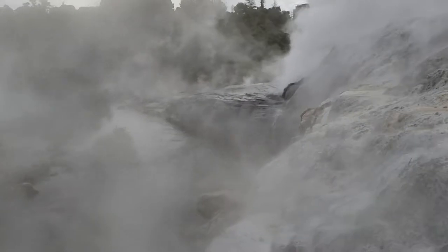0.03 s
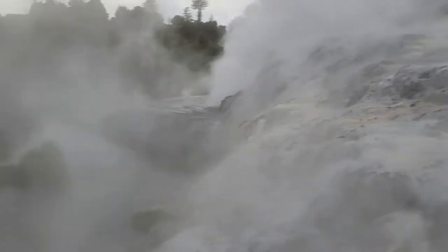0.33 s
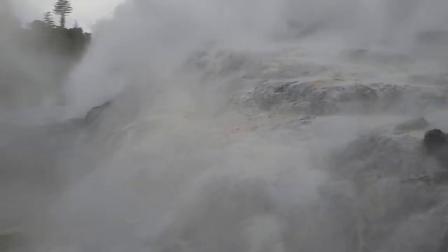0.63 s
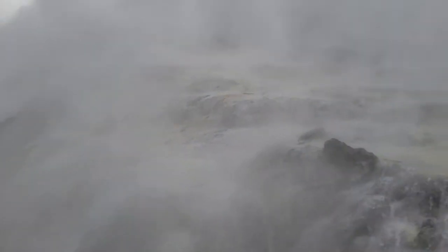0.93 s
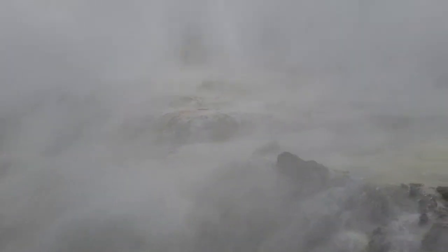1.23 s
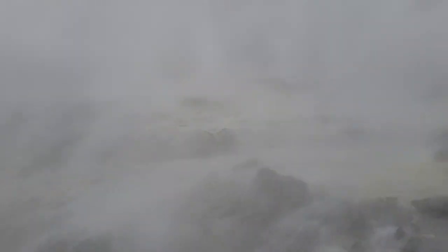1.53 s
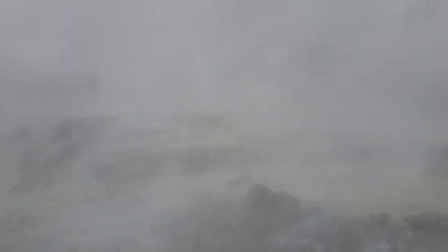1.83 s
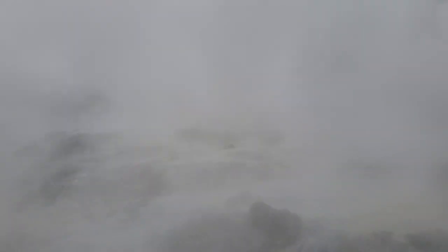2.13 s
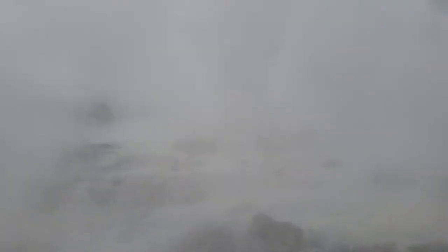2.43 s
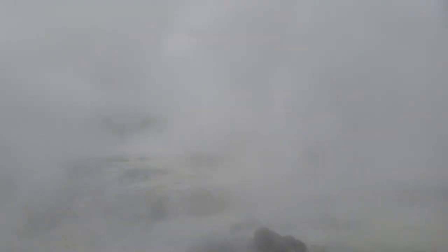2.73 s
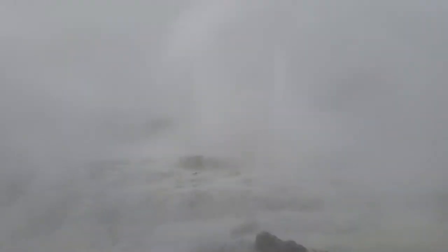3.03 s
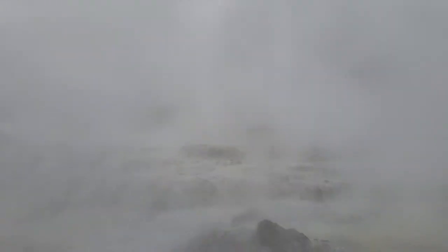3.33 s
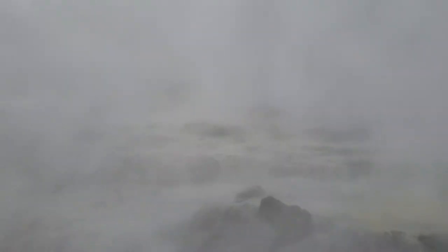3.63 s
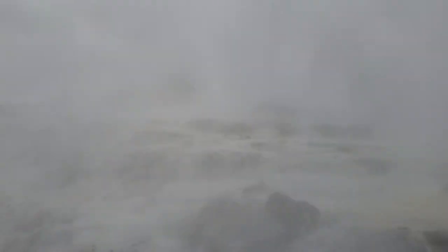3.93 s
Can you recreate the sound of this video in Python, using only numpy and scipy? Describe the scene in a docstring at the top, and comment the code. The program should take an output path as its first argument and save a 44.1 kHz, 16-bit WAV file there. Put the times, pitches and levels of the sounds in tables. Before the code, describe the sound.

Steam rushes and hisses from vents in the ground, with wind buffeting the microphone.

```python
"""Steam vents rush on a geothermal slope, turbulent jets over the low rumble of boiling ground.
At first a throaty vent fades away, while nearer steam adds a fuller rush and a bright hiss on the right.
Puffs of wind buffet the two microphone ports, hardest near the two-second mark.
Just after, the near rush fades and the hiss cuts off, leaving the vent field and the rumble."""
import sys
import numpy as np
from scipy import signal
from scipy.fft import rfft, irfft, next_fast_len
from scipy.io import wavfile
from scipy.ndimage import uniform_filter1d, map_coordinates

SR = 44100
rng = np.random.default_rng(int(sys.argv[2]) if len(sys.argv) > 2 else 0)


def to_wav(s):
    """Save 16-bit WAV."""
    ch = np.atleast_2d(s).T  # columns
    pcm = np.round(np.clip(ch, -1, 1) * 32767)  # PCM
    wavfile.write(sys.argv[1], SR, pcm.astype(np.int16))


N = 176400
T = np.arange(N) / SR
SIZE = next_fast_len(N + 8192)
HZ = np.fft.rfftfreq(SIZE, 1 / SR)


def amp(db):
    """Amplitude grows tenfold for every 20 decibels."""
    return 10 ** (np.asarray(db) / 20)


def unit(x):
    """Normalisation to an rms of 1."""
    return x / np.sqrt(np.mean(x ** 2) + 1e-20)


def along(points, hz=HZ):
    """Interpolation of (frequency, value) points on a logarithmic axis."""
    frequencies, values = np.transpose(points)
    return np.interp(np.log(hz + 1e-6), np.log(frequencies), values)


def curve(rows):
    """Linear interpolation of (seconds, value) points at every sample."""
    return np.interp(T, *np.transpose(rows))


def wobble(rate):
    """Smooth random modulation: a spline with `rate` knots a second."""
    return map_coordinates(rng.standard_normal(1024), [T * rate], mode="wrap")


def turbulence(patchy_db):
    """Intermittency: spectra of two independent noises that share patches of random gain."""
    cells = signal.stft(rng.standard_normal((2, N)), nperseg=512)[2]
    patches = rng.standard_normal(cells.shape[1:])
    for axis in (0, 1):  # smooth over frequency, then time
        patches = uniform_filter1d(patches, size=9, axis=axis)
    noises = signal.istft(cells * amp(patchy_db * unit(patches)), nperseg=512)[1]
    return rfft(noises[:, :N], SIZE)


def flow(spectrum, coherence, right_lead, patchy_db):
    """Partial coherence: flow noise of rms 1, of which the two ports share a part."""
    left, independent = turbulence(patchy_db)
    share = np.clip(along(coherence), 0, 1)
    phase_shift = np.exp(1j * along(right_lead)) if right_lead else 1
    right = phase_shift * (share * left + np.sqrt(1 - share ** 2) * independent)
    shaped = np.array([left, right]) * amp(along(spectrum))
    return unit(irfft(shaped, SIZE)[:, :N])


def vent_field(flutter_db=0.57, right_db=.5):
    """Superposition: the jet noise of many vents merges into one steady, wide rush."""
    # Each row: frequency in Hz, relative spectral density in dB.
    spectrum = [(150, -34), (300, -6), (440, -5.5), (690, 0.3), (1050, -0.9), (1600, .5), (2400, -0.5),
                (3300, 1), (4300, -1.5), (5600, -4), (8300, -10), (11300, -7.5), (12700, -9.5),
                (15000, -7.5)]
    # Each row: time in seconds, level in dB.
    levels = [(0, -33), (2.0, -32.4), (2.42, -32), (2.6, -32), (2.9, -32.5), (3.3, -32), (3.58, -32.5),
              (3.8, -32.5), (3.95, -32)]
    # Each row: frequency in Hz, left-right coherence from 0 to 1.
    coherence = [(300, .88), (700, 0.86), (1000, 0.66), (1250, 0.097), (1650, 0.32), (2200, 0.17),
                 (3300, 0.7), (4300, 0.46), (5200, 0.058), (12000, .02)]
    # Each row: frequency in Hz, phase lead in radians.
    right_lead = [(300, 0.019), (900, 0.57), (1600, 1.66), (3300, 1.94), (4400, 0.057)]
    envelope = amp(curve(levels) + flutter_db * wobble(40))
    return envelope * amp([[0], [right_db]]) * flow(spectrum, coherence, right_lead, patchy_db=1.35)


def near_steam(flutter_db=.5):
    """Turbulent mixing of nearer steam makes a fuller rush, which fades out past halfway."""
    # Each row: frequency in Hz, relative spectral density in dB.
    spectrum = [(100, -25), (200, -10), (320, -3.5), (430, -10), (620, -2), (900, -1), (1500, 1),
                (2100, 1.5), (3200, -0.5), (4200, -7.5), (5600, -11), (9000, -8.5), (13000, -10),
                (14700, -5.5), (15800, -13.5)]
    # Each row: time in seconds, level in dB.
    levels = [(0, -32), (.4, -32), (.9, -31), (1.5, -30), (1.68, -32.5), (1.85, -30), (2.1, -34.5),
              (2.32, -36.2), (2.37, -55), (2.45, -75)]
    # Each row: frequency in Hz, left-right coherence from 0 to 1.
    coherence = [(250, 0.88), (650, 0.52), (1100, 0.16), (2500, 0.2), (4500, .03)]
    # Each row: frequency in Hz, phase lead in radians.
    right_lead = [(200, .1), (700, 0.41), (1300, 2.56), (2600, 3.06)]
    envelope = amp(curve(levels) + flutter_db * wobble(25.2))
    return envelope * flow(spectrum, coherence, right_lead, patchy_db=0.78)


def bright_hiss(surge_db=0.06, sputter_db=0.93, stop_s=2.335, release_s=0.0068, left_db=-24):
    """High-frequency jet noise sputters, then cuts off; a level difference places it on the right."""
    # Each row: frequency in Hz, relative spectral density in dB.
    spectrum = [(400, -39), (1400, -8), (2500, -31), (3200, -10), (3800, -2), (4400, .3), (5300, 0),
                (6300, -1.6), (7000, -7.5), (7700, -12), (8600, -23), (9800, -13.5), (11500, -9),
                (13000, -10), (14700, -14), (15800, -22)]
    # Each row: time in seconds, level at the right port in dB.
    levels = [(0, -31), (.3, -28.5), (.55, -28), (.78, -25.5), (1.1, -25.8), (1.5, -25.5), (1.65, -26),
              (1.93, -27), (2.1, -28.5), (2.33, -29.5)]
    hiss = irfft(turbulence(patchy_db=1.14) * amp(along(spectrum)), SIZE)[:, :N]
    envelope = amp(curve(levels) + surge_db * wobble(27) + sputter_db * wobble(65))
    gate = np.clip(1 - (T - stop_s) / release_s, 0, 1)
    return gate * envelope * amp([[left_db], [0]]) * unit(hiss)


def wind(attack_s=.008, release_s=0.017, gain_db=0.47):
    """Pressure fluctuations: the eddies of each puff shake one port with a burst of low noise."""
    # Each row: start and length in seconds, relative level in dB, centre in Hz, port (0 left, 1 right).
    puffs = [(0.032, 0.061, -31.5, 103, 0), (0.443, 0.07, -32, 85, 0), (0.685, 0.11, -38.5, 98, 0),
             (1.123, 0.038, -33, 113, 0), (1.35, 0.15, -32.1, 90, 1), (1.43, 0.15, -36, 121, 0),
             (1.611, 0.28, -27.5, 132, 0), (1.802, 0.037, -25, 175, 0), (1.927, 0.11, -17, 169, 0),
             (2.056, 0.098, -22, 117, 0), (2.06, 0.036, -17, 95, 1), (2.111, 0.17, -29, 88, 1),
             (2.202, 0.04, -19, 116, 0), (2.273, 0.047, -20.5, 84, 1), (2.28, 0.066, -31, 130, 0)]
    # Each row: multiple of the centre frequency, relative spectral density in dB.
    eddy_spectrum = [(.12, -15), (.3, -2.5), (.6, 1), (1.2, -3), (2, -9.5), (3, -23), (5, -50), (10, -90)]
    ports = np.zeros((2, N))
    for start, length, db, centre_hz, port in puffs:
        white = rfft(rng.standard_normal(SIZE))
        eddies = irfft(white * amp(along(eddy_spectrum, HZ / centre_hz)), SIZE)[:N]
        rise = np.clip((T - start) / attack_s + .5, 0, 1)
        fall = np.exp(-np.maximum(T - start - length + release_s / 2, 0) / release_s)
        puff = unit(eddies * rise * fall) * np.sqrt(length * SR / N)  # rms near 1 over its own length
        ports[int(port)] += amp(db + gain_db) * puff
    return ports


def side_vent(level_db=-41, flutter_db=2.5, gone_s=0.79, fade_s=0.48):
    """Directivity: a throaty band of jet noise falls away as the microphone turns from its vent."""
    # Each row: frequency in Hz, relative spectral density in dB.
    spectrum = [(600, -30), (1300, -16), (1800, -1), (2200, 2), (2500, -5), (3000, -11), (5000, -35)]
    fade = np.clip((gone_s - T) / fade_s, 0, 1)
    envelope = fade * amp(level_db + flutter_db * wobble(26.5))
    return envelope * flow(spectrum, coherence=[(2000, 0.99)], right_lead=[(2000, -0.34)], patchy_db=0.5)


def boiling(surge_db=0.55):
    """Boiling in the ground makes a lumpy rumble, whose long waves reach both ports nearly alike."""
    # Each row: frequency in Hz, relative spectral density in dB.
    spectrum = [(15, -50), (25, -22), (38, -7.5), (66, 1), (105, -4.5), (130, -8), (200, -9.5),
                (260, -12.5), (400, -22), (700, -45), (1500, -100)]
    # Each row: time in seconds, level in dB.
    levels = [(0, -38.5), (.55, -38.5), (.75, -35.5), (.97, -40), (1.45, -39.5), (2.3, -41), (2.48, -44.5),
              (2.6, -42), (2.7, -40), (2.8, -36.5), (2.92, -41), (3.25, -45.5), (3.45, -37), (3.56, -44),
              (3.75, -40), (3.95, -43)]
    # Each row: frequency in Hz, left-right coherence from 0 to 1.
    coherence = [(60, 0.9), (250, 0.91)]
    envelope = amp(curve(levels) + surge_db * wobble(13))
    return envelope * flow(spectrum, coherence, right_lead=None, patchy_db=.8)


def scene():
    """The pressures of steam, boiling and wind add linearly at each port."""
    return vent_field() + boiling() + near_steam() + side_vent() + bright_hiss() + wind()


def record(dry, low_cut_hz=39, top_hz=15950):
    """Finite bandwidth: the microphone sheds the deepest bass and passes nothing above its limit."""
    high_pass = 1 / np.sqrt(1 + (low_cut_hz / (HZ + 1e-3)) ** 8)
    return irfft(rfft(dry, SIZE) * high_pass * (HZ < top_hz), SIZE)[:, :N]


dry = scene()
out = record(dry)
to_wav(out)
```